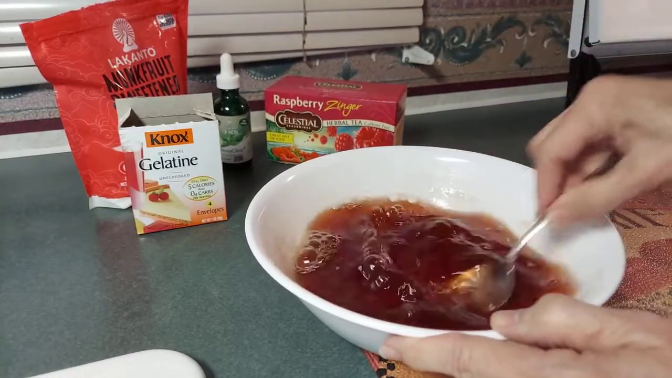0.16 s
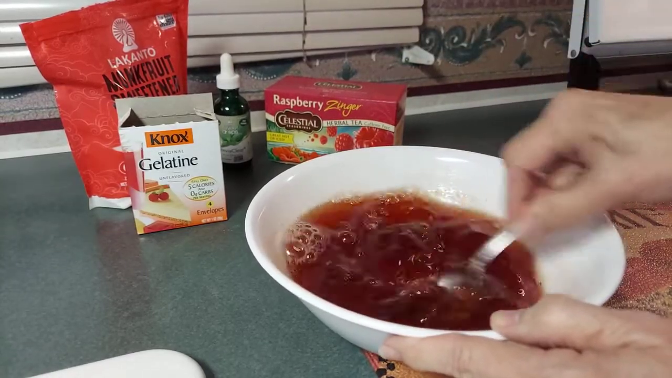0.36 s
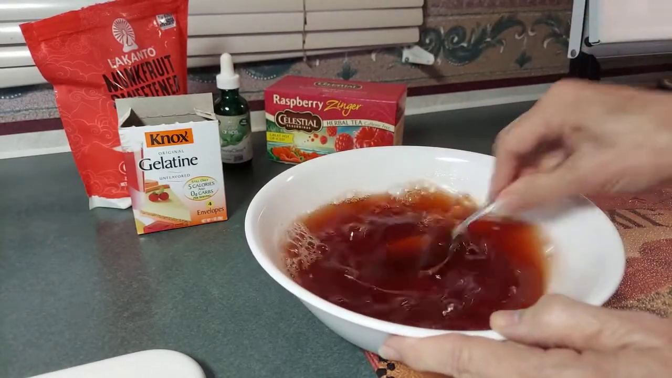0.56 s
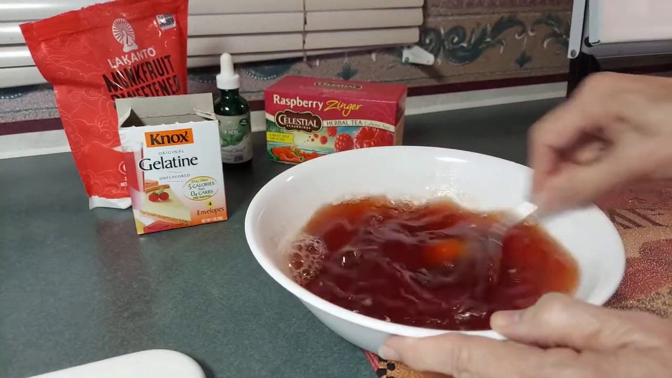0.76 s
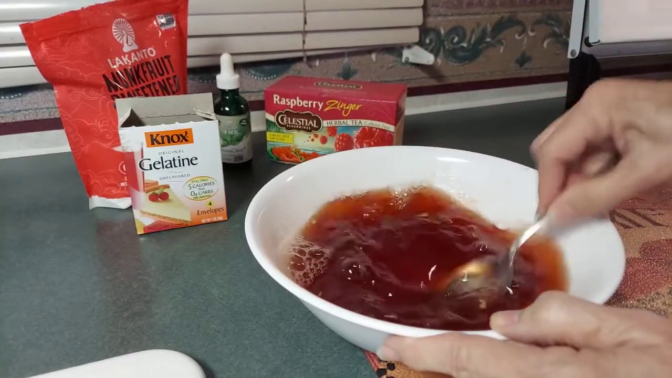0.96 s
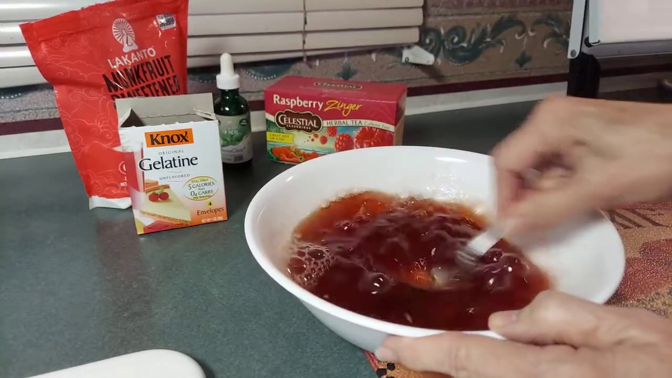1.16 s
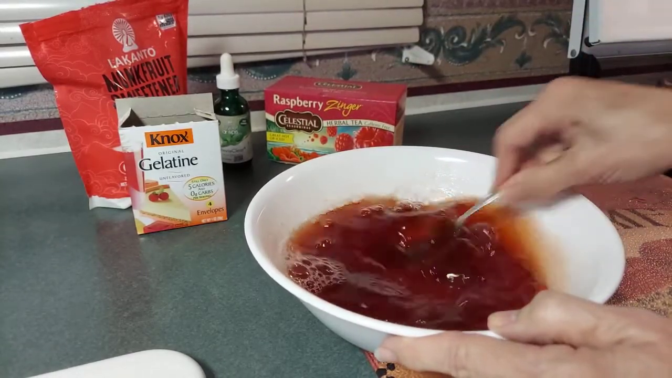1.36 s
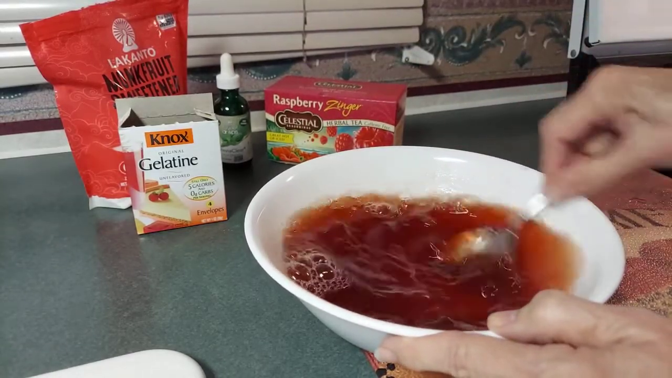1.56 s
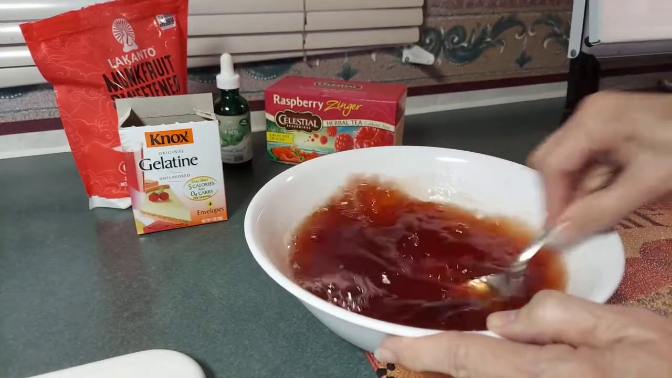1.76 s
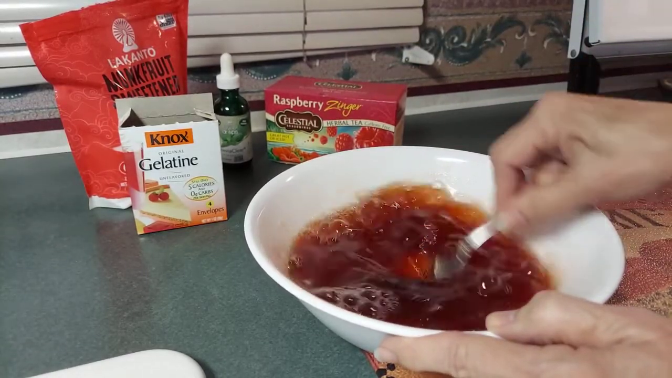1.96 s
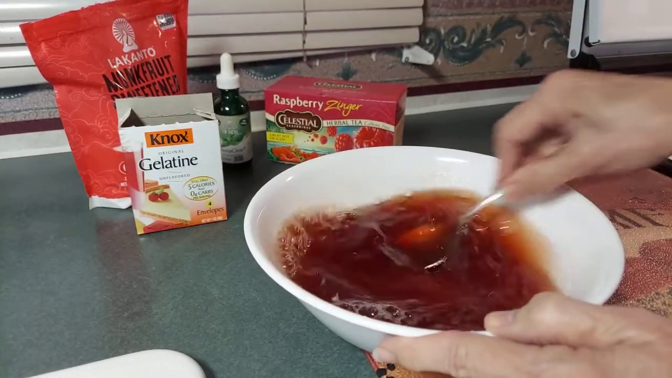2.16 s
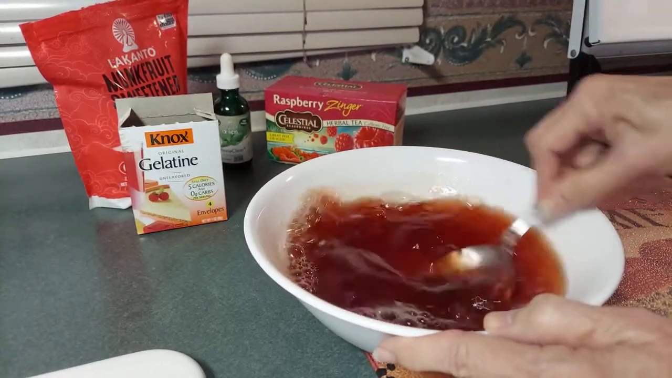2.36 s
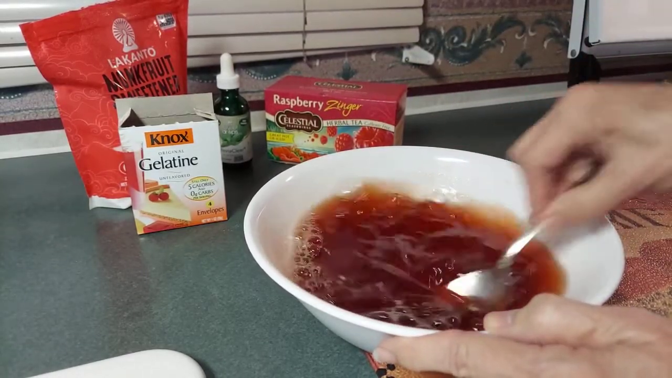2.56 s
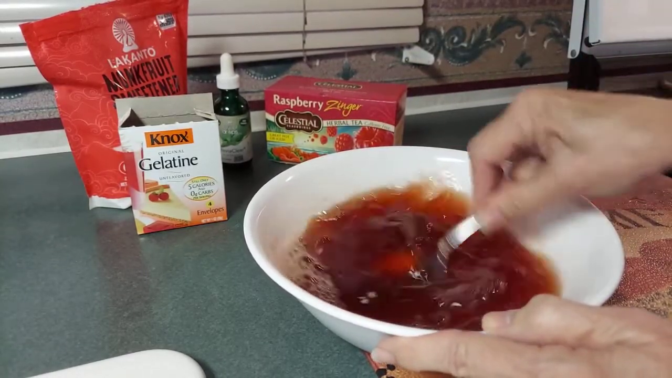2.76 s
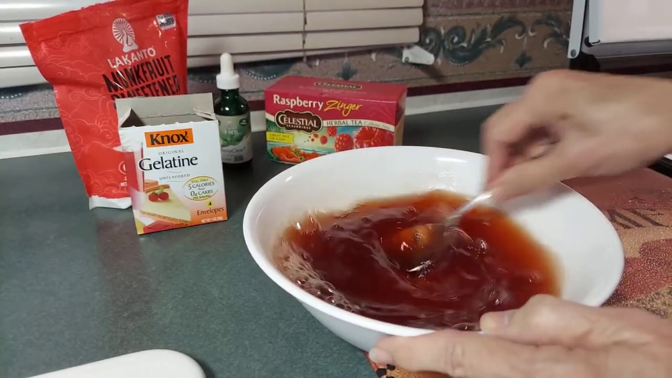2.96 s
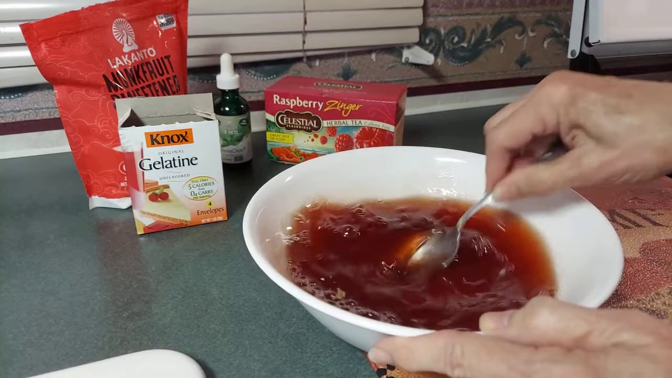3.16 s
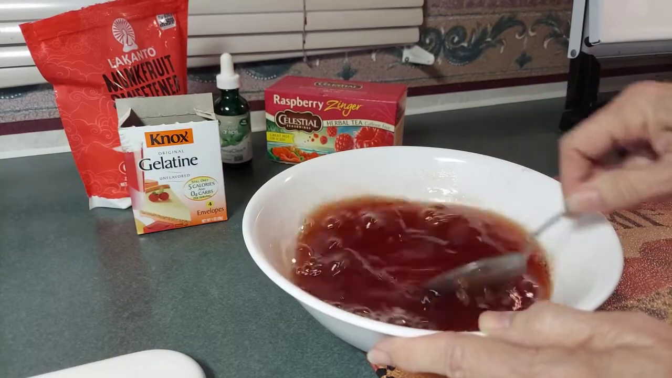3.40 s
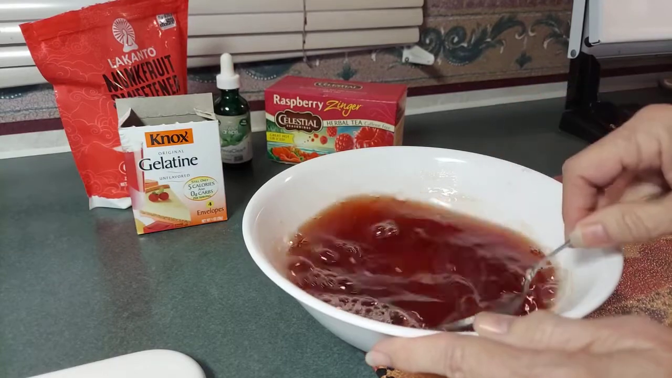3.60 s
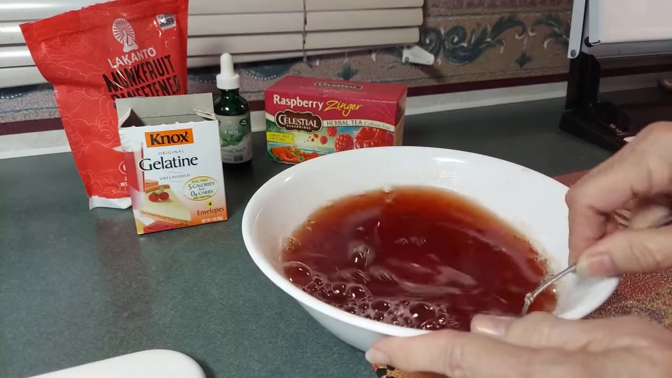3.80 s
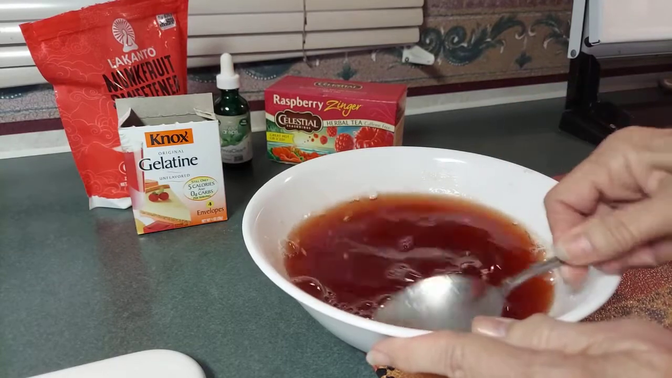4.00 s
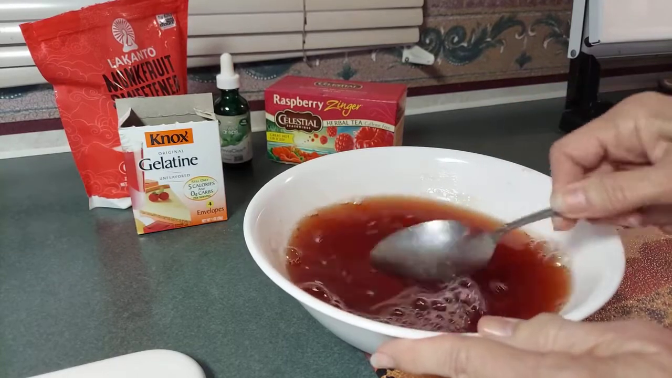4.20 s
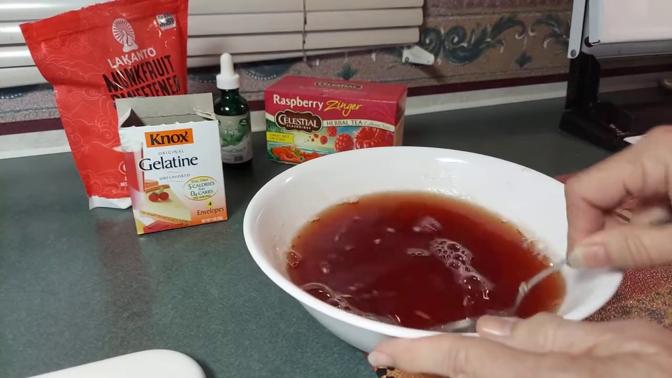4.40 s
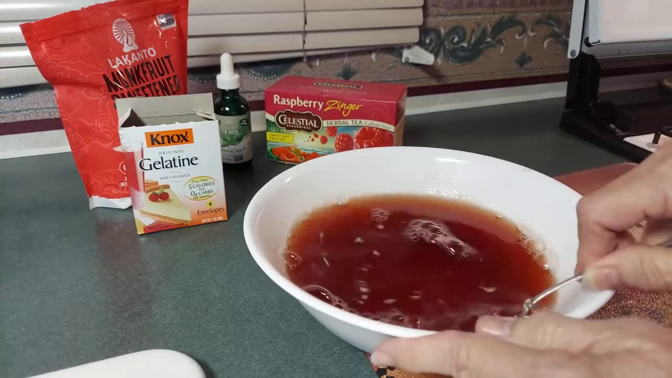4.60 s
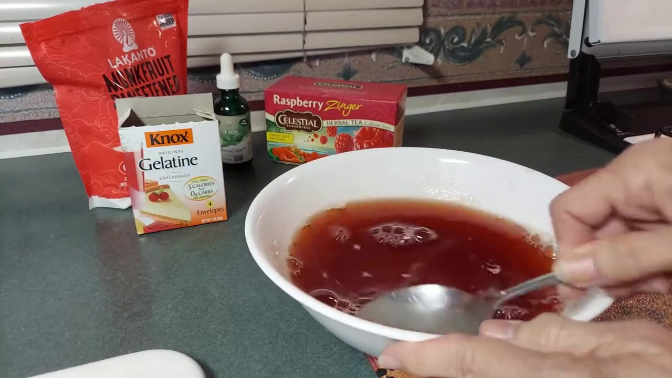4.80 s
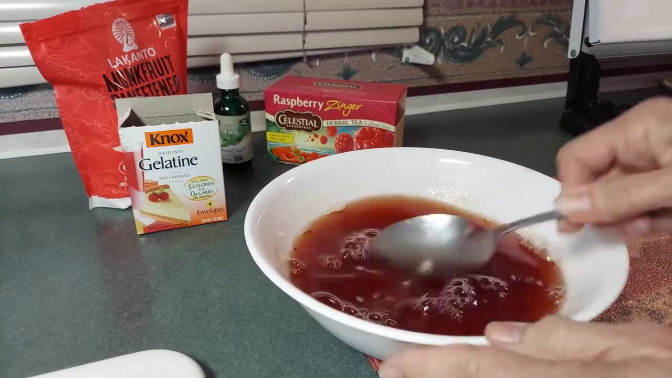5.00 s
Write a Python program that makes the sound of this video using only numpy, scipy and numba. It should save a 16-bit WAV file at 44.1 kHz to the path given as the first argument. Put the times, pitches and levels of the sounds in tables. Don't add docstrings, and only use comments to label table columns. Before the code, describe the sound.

Close up in a quiet home kitchen, a metal spoon sweeps quickly through liquid in a bowl, about seven or eight strokes a second, with wet scrapes, short glassy clinks and bubbly plops. Stirring stops just after three seconds; faint taps, light swishes and low bumps of the bowl on the counter follow. Stereo, treble brighter on the right.

```python
import sys
import numpy as np
from scipy import signal
from scipy.fft import rfft, irfft, next_fast_len
from scipy.io import wavfile
from scipy.ndimage import uniform_filter1d
from numba import njit

SR = 44100
rng = np.random.default_rng(int(sys.argv[2]) if len(sys.argv) > 2 else 0)


def gain_from_decibels(decibels):
    exponent = np.asarray(decibels, float) / 20
    return 10 ** exponent


def generate_wav(sig):
    pcm = np.round(np.clip(np.atleast_2d(sig).T, -1, 1) * 32767).astype(np.int16)
    wavfile.write(sys.argv[1], SR, pcm)


N = 222521
T = np.arange(N) / SR


def unit(x):
    return x / np.sqrt(np.mean(x ** 2))


def shape(x, table):
    hz, db = np.transpose(table)
    size = next_fast_len(N + 4096)
    bin_hz = np.arange(size // 2 + 1) * SR / size
    gain = gain_from_decibels(np.interp(np.log(bin_hz + 1), np.log(hz), db))
    return irfft(rfft(x, size) * gain, size)[..., :N]


def walk(rate_hz):
    k = int(SR / rate_hz)
    levels = rng.standard_normal(N // 100)[:N // k + 1]
    held = np.repeat(levels, k)[:N]
    return 1.56 * uniform_filter1d(uniform_filter1d(held, k), k)


def spikes(times_s, sizes):
    x = np.zeros(N)
    np.add.at(x, np.clip((np.asarray(times_s) * SR).astype(int), 0, N - 1), sizes)
    return x


def decay(t60_s):
    return 1000. ** (-1 / (t60_s * SR))


@njit
def ring(x, hz, fade):
    y, z = np.empty(len(x), np.complex128), 0j
    for i in range(len(x)):
        z = z * fade * np.exp(2j * np.pi * hz[i] / SR) + x[i]
        y[i] = z
    return y


def smear(x, t60_s, alike, rise_s=1e-5):
    t = T[:int(t60_s * SR)]
    same, left, right = rng.standard_normal((3, SR // 2))[:, :len(t)]
    noise = alike * same + np.sqrt(1 - alike ** 2) * np.array([left, right])
    tails = noise * 1000. ** (-t / t60_s) * np.minimum(t / rise_s, 1)
    return signal.fftconvolve(x[None], tails, axes=1)[:, :N]


def swells(s, db, rise_s, fall_s, bed_db, columns, bed_columns, order=2):
    t = T[::44]
    late_s = t - np.asarray(s)[:, None]
    before = late_s < 0
    width_s = np.where(before, np.reshape(rise_s, (-1, 1)), np.reshape(fall_s, (-1, 1)))
    bells = np.exp(-2 * np.abs(late_s / width_s) ** np.where(before, order, 2))
    power = gain_from_decibels(2 * np.asarray(db))[:, None] * bells
    bed = gain_from_decibels(2 * bed_db[::44])
    total = power.sum(0) + bed
    slow = [10 * np.log10(total)]
    slow += [(c @ power + b * bed) / total for c, b in zip(columns, bed_columns)]
    return [np.interp(T, t, c) for c in slow]


STIR_ENDS_S = 3.2


def stirring():
    return 1 / (1 + np.exp((T - STIR_ENDS_S) / 0.026))


# hardest contact in s, low wall modes in dB,
# middle, high and deepest mode in dB relative to low.
STROKES = [(0.051, -47.5, 0.5, -6.5, -3.5), (0.135, -42, -7, -12, -30), (0.27, -46.5, -14, -11, 2),
           (0.397, -44.5, -2.5, -2.5, -3.5), (0.542, -43, -5, -18.5, 10.5), (0.663, -49, -2.5, -1.5, -24),
           (0.805, -47.5, -6, -10.5, 22), (0.932, -48, -6.5, -4.5, -37), (1.063, -41, -1.5, -13, 7),
           (1.2, -42, -4.5, -1.5, -2), (1.349, -37, -11, -12, 10), (1.476, -44.5, 0, 0.5, -18.5),
           (1.61, -38, -1.5, -14, 0.5), (1.761, -44, 1.5, -1.5, -14.5), (1.893, -41.5, -1.5, -13, 5),
           (2.021, -44.5, 1.5, -3.5, -8), (2.162, -38.5, -7.5, -18, -4), (2.284, -48, 3, -1, -4),
           (2.436, -49.5, -12, -6, 15), (2.529, -52, -0.5, 0.5, 10), (2.69, -47.5, -10.5, -6.5, 11),
           (2.812, -37, -8, -16.5, -2), (2.959, -51.5, -5.5, -7, 0.5), (3.072, -52, 3.5, -14, -4)]
# landing to hardest contact in s, fade after it in s.
STROKE_SPANS = [(0.059, 0.052), (0.043, 0.048), (0.04, 0.046), (0.027, 0.046), (0.027, 0.023),
                (0.033, 0.039), (0.022, 0.031), (0.04, 0.058), (.03, .04), (0.025, 0.055), (0.03, 0.018),
                (0.0451, .04), (.04, 0.041), (0.045, 0.024), (0.028, 0.042), (0.04, 0.024), (0.028, 0.028),
                (0.038, 0.043), (0.034, 0.036), (0.014, 0.11), (0.025, 0.052), (0.029, 0.06), (0.045, 0.18),
                (0.012, 0.028)]
# time in s, low modes in dB,
# middle modes, high modes and grit in dB relative to low.
TOUCHES = [(3.154, -59.5, 3, -7, -16), (3.197, -62.5, -2, -11, 4), (3.72, -76, 3, -10, -10),
           (3.916, -78, -7, -4, -1), (4.1, -101, -1, -1, 0), (4.19, -77.5, -2, -9.5, 3),
           (4.515, -94, 3.5, -30.5, -22), (4.612, -94.5, 10, 10, 24), (4.745, -76, 2, 2, -6),
           (4.812, -65.5, 0.5, -18, -16), (4.899, -81.5, -9, -6, 20.5)]
TOUCH_RISE_S, TOUCH_FALL_S, TOUCH_DEEP_DB = 0.02, 0.049, 14.5
GRIT_DB, GRIT_PER_DB = -63.5, .5
DRAG_DB = -65.5


def contact():
    s, db, middle, high, deep = np.transpose(STROKES)
    rise_s, fall_s = np.transpose(STROKE_SPANS)
    grit = GRIT_DB + GRIT_PER_DB * (db + 44.0) - db
    s2, db2, middle2, high2, grit2 = np.transpose(TOUCHES)

    def both(stroke, touch):
        return np.r_[stroke + 0 * s, touch + 0 * s2]

    columns = [both(middle, middle2), both(high, high2), both(grit, grit2), both(deep, TOUCH_DEEP_DB)]
    bed_db = -100 + (DRAG_DB + 106.5) * stirring()
    return swells(both(s, s2), both(db, db2), both(1.275 * rise_s, TOUCH_RISE_S),
                  both(fall_s, TOUCH_FALL_S), bed_db, columns, (-1.0, -6.0, -8.5, -4.5), order=4)


def catches(db):
    sizes = gain_from_decibels(np.minimum(3.0 * rng.exponential(size=N), 11))
    caught = rng.random(N) < 1500 / SR
    return unit(caught * sizes * rng.choice([-1, 1], N)) * gain_from_decibels(db + 3.0 * walk(70))


def body(push, modes, drift, patchy_db, lag_s, deep_db=0, rise=0):
    out = 0
    for k, (hz, db, t60_s) in enumerate(modes):
        share_db = db + patchy_db * walk(14) + deep_db * (k == 0)
        z = ring(push * gain_from_decibels(share_db), hz * (1 + rise + drift * walk(9.1)), decay(t60_s))
        turn = 2 * np.pi * hz * lag_s * (rng.standard_normal() + 0.67 * walk(4.915))
        out = out + np.array([(z * np.exp(1j * turn)).imag, z.imag])
    return out


# time in s, crack peak in dB,
# low, middle and high ring in dB.
CLINKS = [(0.165, -44, -63, -42.5, -34), (0.2334, -40.5, -46, -36, -34), (0.2838, -49, -38.5, -59, -68),
          (0.3865, -41.5, -35, -39, -33), (0.4105, -37, -37, -40.5, -37), (1.1772, -42.5, -40, -38, -33),
          (1.3284, -54, -40.5, -59.5, -60), (1.3634, -47.5, -36, -47.5, -25.5),
          (1.5496, -28, -70, -49.5, -36), (1.5668, -18, -29.5, -23, -69), (1.6474, -46.5, -65.5, -52, -26),
          (1.733, -38, -36, -53, -52), (1.8692, -57.5, -76, -53, -47), (1.9904, -30, -67, -51, -46),
          (2.5396, -24.5, -32.5, -29, -11), (2.6770, -39.5, -36.5, -41.5, -59),
          (2.8055, -64, -39.5, -51, -48), (2.826, -26, -37, -35.5, -16.5),
          (3.0639, -33.5, -40.5, -36.5, -20.5), (3.1423, -33, -67.5, -38.5, -33)]
TAPS = [
    (3.7074, -52, -61, -59, -91),
    (3.8995, -65, -87, -89, -71.5),
    (4.1738, -60, -72, -64.5, -97),
    (4.5023, -72, -54, -61, -90),
]
# time in s, crack peak in dB.
GRAZES = [(0.0943, -51), (0.1532, -49), (0.5131, -56), (0.6497, -48), (0.6708, -47), (0.6829, -38),
          (0.8968, -45), (1.1525, -52), (1.3425, -38), (1.4024, -28), (1.4974, -51), (1.8849, -40),
          (1.9785, -46), (2.1128, -51), (2.1462, -45), (2.2048, -47), (2.3016, -47), (2.4128, -49),
          (2.5142, -55), (2.7325, -43), (2.7827, -51), (2.8743, -42), (3.1848, -53)]
GRAZE_RING_DB = (-28, -5.5, -23.5)
# frequency in Hz, level in dB, t60 in s.
BOWL = [
    [(840, -1, .065), (930, -8, .06), (1035, -9, .06), (1135, -1, .07), (1190, 0, .07)],
    [(1360, -5, .035), (1510, 0, .04), (1590, -2, .04), (1665, 0, .04), (1765, -1, .04), (1920, -1, .035),
     (2030, -4, .035)],
    [(2640, -18, .03), (2780, -13, .03), (2920, -7, .03), (3050, -6, .03), (3200, 0, .035), (3300, -2, .03),
     (3600, -9, .025), (3850, -16, .03)],
]
# frequency in Hz, level in dB, t60 in s.
SPOON = [(5150, -4, .025), (5680, -2, .04), (5850, 0, .04)]
# centre in Hz, level in dB.
GRIT = [(1600, -4.5), (2700, -24.5), (4400, -10.5), (6000, -7.5), (9000, -18), (13000, -22.5)]
# frequency in Hz, gain in dB.
GAP = [(1950, 0), (2200, -9), (2550, -9), (2900, 0), (3500, 0), (4000, -8), (4600, -3), (5200, 0)]
SWEEP_RISE = 0.016


def spoon():
    low_db, middle_db, high_db, grit_db, deep_db = contact()
    grazes = [(s, db, *np.add(db, GRAZE_RING_DB)) for s, db in GRAZES]
    s, crack_db, *ring_db = np.transpose(list(CLINKS) + list(TAPS) + grazes)
    blows = [smear(spikes(s, gain_from_decibels(db - 17)), .012, 1.0, .0025)[1] for db in ring_db]
    blows[2] = blows[2] * gain_from_decibels(-5)

    slope = uniform_filter1d(np.gradient(low_db), size=900)
    rise = SWEEP_RISE * np.tanh(-slope * SR / 250)
    low_push = catches(low_db - 34.5) + blows[0]
    wall = body(low_push, BOWL[0], 0.0034, 4.6, 0.00019, deep_db, rise)
    middle_push = catches(low_db + middle_db - 31.5) + blows[1]
    wall += body(middle_push, BOWL[1], 0.03, 2.1, 0.00013, rise=rise)
    high_push = catches(low_db + high_db - 26.5) + blows[2]
    wall += body(high_push, BOWL[2], 0.013, 2.7, 0.000202)

    cracks, grit = spikes(s, gain_from_decibels(crack_db)), catches(low_db + grit_db)
    steel_push = grit * stirring() * gain_from_decibels(-32 + 3 * walk(9)) + cracks * gain_from_decibels(-22)
    steel = body(steel_push, SPOON, .012, 2, 1.5e-4)

    same, *own = rng.standard_normal((3, N))
    puffs = np.sqrt(uniform_filter1d(grit ** 2, size=100).clip(0))
    scratch = puffs * (.5 * same + np.array(own)) * gain_from_decibels(3.0)
    fizz = 0
    for hz, db in GRIT:
        band = [(hz / 2.2, db - 40), (hz / 1.2, db), (hz * 1.2, db), (hz * 2.2, db - 40)]
        fizz = fizz + shape(scratch, band) * gain_from_decibels(4.5 * walk(25))

    crack = smear(cracks, 0.043, 0.077, .0015) * gain_from_decibels(-6.5)
    crack = crack + smear(cracks, 0.074, 0.74, 0.0024) * gain_from_decibels(-17.0)
    crack = shape(crack, [(500, -28.5), (900, -10), (3200, -4), (4200, 9.5), (5700, 3.0),
                          (9000, -7.0), (16000, -15.5)])
    ringing = shape(shape(wall, GAP) + steel, [(450, -26.0), (620, -21.0), (800, 1.0)])
    return ringing + shape(fizz + crack, GAP)


# time in s, frequency in Hz, length in s, level in dB rms.
SINGS = [(0.134, 1180, 0.03, -48), (0.14, 3220, 0.028, -56), (0.273, 1090, 0.023, -52),
         (0.383, 1170, 0.032, -53), (0.387, 3210, 0.032, -55), (0.533, 1110, 0.031, -51),
         (0.94, 3220, 0.021, -57), (1.072, 1200, 0.029, -53), (1.078, 2030, 0.02, -54),
         (1.207, 1220, 0.03, -52), (1.209, 3220, 0.03, -53), (1.215, 1550, 0.036, -53),
         (1.341, 840, 0.034, -44), (1.341, 1180, 0.027, -47), (1.363, 3230, 0.032, -55),
         (1.405, 2400, 0.021, -57), (1.405, 1690, 0.04, -55), (1.471, 1670, 0.033, -51),
         (1.473, 3170, 0.025, -52), (1.481, 1200, 0.029, -51), (1.562, 2380, 0.024, -57),
         (1.57, 3260, 0.04, -58), (1.75, 1560, 0.025, -51), (1.752, 2970, 0.021, -58),
         (1.758, 3210, 0.021, -50), (1.758, 1360, 0.022, -51), (1.76, 1180, 0.025, -48),
         (1.76, 1750, 0.029, -53), (1.898, 1890, 0.033, -54), (1.902, 1510, 0.031, -51),
         (1.902, 3240, 0.031, -57), (1.906, 840, 0.034, -51), (1.906, 1200, 0.04, -53),
         (2.001, 1720, 0.036, -54), (2.019, 2990, 0.024, -58), (2.021, 1180, 0.023, -49),
         (2.025, 2050, 0.022, -53), (2.151, 1110, 0.024, -46), (2.181, 860, 0.029, -50),
         (2.275, 3260, 0.038, -57), (2.277, 1580, 0.033, -51), (2.303, 2900, 0.024, -57),
         (2.688, 1170, 0.023, -48), (2.702, 1920, 0.034, -54), (2.808, 1580, 0.035, -51),
         (2.967, 1930, 0.034, -54), (3.067, 3210, 0.019, -49), (3.067, 1520, 0.022, -51)]
MORE_SINGS = [(.3, 845, 0.059, -61.5), (.57, 867, 0.054, -60.5), (.66, 1153, .04, -61.5),
              (.8, 878, 0.053, -61), (.835, 1144, 0.027, -54.5), (1.625, 1133, 0.034, -43.5),
              (2.45, 1870, 0.049, -56.5), (2.46, 864, 0.084, -66), (.8, 5830, 0.066, -70.5),
              (1.075, 5760, 0.043, -70), (2.42, 5750, 0.023, -63), (2.7, 5730, 0.11, -69)]
SING_DB, SING_T60_S, SING_STEADY = 3, .11, .75


def singing():
    out = np.zeros((2, N))
    for s, hz, length_s, db in list(SINGS) + list(MORE_SINGS):
        start = int((s - .1) * SR)
        span = slice(start, start + int(.2 * SR))
        late = (T[span] - s) / (0.56 * length_s)
        pitch_hz = hz * (1 + 0.002 * np.tanh(late))
        z = ring(rng.standard_normal(len(late)), pitch_hz, decay(SING_T60_S))
        z = z / (np.abs(z) + 1e-9) ** SING_STEADY
        turn = -.5 + .5 * rng.standard_normal()
        pair = unit(np.array([(z * np.exp(1j * turn)).imag, z.imag]))
        out[:, span] += gain_from_decibels(db + SING_DB) * np.exp(-late ** 2) * pair
    return shape(out, [(600, -25), (780, 0)])


# start in s, start
# pitch in Hz, end pitch in Hz, life in s, peak in dB.
BUBBLES = [(0.0532, 1510, 2700, .029, -42), (.1852, 445, 860, 0.057, -54), (0.2341, 1905, 3050, .0191, -28),
           (.2345, 2010, 2510, .0121, -33), (0.2358, 1435, 1525, 0.0171, -34.5),
           (0.3858, 2055, 2740, 0.0141, -38), (.3882, 922, 942, .0351, -38),
           (0.4102, 2730, 3140, .0121, -34), (0.6492, 1688, 1795, 0.0221, -40.5),
           (.6722, 2910, 3090, .0081, -43), (.7022, 665, 652, 0.0441, -45.5),
           (.7031, 2275, 2530, 0.0071, -35), (0.8978, 1505, 1660, 0.0181, -39.5),
           (1.0572, 1605, 1905, .0251, -40.5), (1.3648, 2700, 3250, 0.0091, -38),
           (1.3952, 1500, 3300, .008, -40), (1.4022, 2055, 2355, 0.0181, -38),
           (1.5688, 852, 1044, 0.0211, -21.5), (1.5758, 1005, 2150, 0.0241, -27.5),
           (1.6082, 3185, 3245, .0161, -39), (1.6478, 3155, 3400, 0.0131, -35),
           (1.6692, 2400, 3000, .0051, -42), (2.3012, 2215, 2520, 0.0065, -33),
           (2.5412, 1028, 1042, .0281, -36), (2.9418, 662, 720, 0.075, -50.5),
           (2.9532, 1905, 1945, .0301, -48), (3.0242, 932, 1245, .0201, -44),
           (3.0652, 1032, 1048, .0221, -34), (3.2712, 1505, 1560, .028, -62.5),
           (3.3162, 960, 2100, 0.0441, -68.5), (4.5002, 1452, 1484, 0.0201, -56),
           (4.5032, 760, 800, .016, -64), (3.7102, 790, 820, .03, -66), (3.7202, 480, 520, .02, -72),
           (1.5502, 1900, 2600, .007, -38), (.2462, 1950, 2700, .014, -38)]


def bubbles():
    out, wobble = np.zeros((2, N)), walk(250)
    for s, hz0, hz1, life_s, db in BUBBLES:
        span = slice(int(s * SR), int((s + 1.6 * life_s) * SR))
        t = T[span] - T[span][0]
        glide_hz = hz0 * (hz1 / hz0) ** np.minimum(t / life_s, 1.1)
        depth = min(.05, 0.16 * abs(np.log(hz1 / hz0)))
        phase = 2 * np.pi * np.cumsum(glide_hz * (1 + depth * wobble[span])) / SR
        swell = (1 - np.exp(-t / .0015)) * np.exp(-2.5 * (t / life_s) ** 2)
        tone = np.sin(phase + hz0 * np.array([[6e-4], [0]]))
        out[:, span] += gain_from_decibels(db + 2.5 * wobble[span]) * swell * tone
    return out + smear(out[1], 0.0354, 1.0) * gain_from_decibels(-30.5)


def slosh():
    low_db, middle_db = contact()[:2]
    out = np.zeros((2, N + SR))
    for when, pitch, size, cycles in rng.random((600, 4)):
        i, hz = int(when * 3.25 * SR), 750 * 5.5 ** pitch
        t = T[:int((6 + 16 * cycles) / hz * SR)]
        life = t / t[-1]
        phase = 2 * np.pi * hz * (t * (1 + 0.177 * life) + np.array([[1.2e-4], [0]]))
        db = min(low_db[i], -47) + middle_db[i] / 2 - 3 - 9 * pitch - 3.5 * np.log(size + .2)
        out[:, i:i + len(t)] += gain_from_decibels(db) * np.sqrt(life) * np.exp(-5 * life) * np.sin(phase)
    return out[:, :N]


FLECK_DB, FLECK_SCATTER_DB, FLECK_TILT_DB = 14, 3, -17


def splash():
    low_db, _, _, grit_db, _ = contact()
    out = np.zeros((2, N + SR))
    for when, pitch, size, length in rng.random((800, 4)):
        i, hz = int(when * STIR_ENDS_S * SR), 3400 * 4.4 ** pitch
        t = T[:int((.002 + .012 * length ** 2) * SR)]
        life = t / t[-1]
        jitter = np.cumsum(.25 * rng.standard_normal(len(t)))
        phase = 2 * np.pi * hz * (t * (1 + 0.014 * life) + np.array([[size], [0]])) + jitter
        db = low_db[i] + grit_db[i] + FLECK_DB + FLECK_TILT_DB * pitch
        db -= FLECK_SCATTER_DB * np.log(size + 0.015)
        swell = np.minimum(t / 0.0008, 1) * np.exp(-4 * life)
        out[:, i:i + len(t)] += gain_from_decibels(db) * swell * np.sin(phase)
    return out[:, :N]


# time in s, peak in dB.
SNAPS = [(0.2843, -39), (1.1518, -57), (1.322, -49), (1.3418, -36), (1.3628, -37), (1.3843, -41.5),
         (1.4024, -35.5), (1.6472, -53), (1.722, -66), (1.733, -63), (1.8863, -37), (2.145, -43),
         (2.3999, -66), (2.4136, -44.5), (2.733, -41.5), (2.887, -48), (.69, -46), (.65, -46), (.672, -53),
         (0.898, -46.5), (.941, -54), (2.919, -48.5), (2.961, -48)]


def snaps():
    s, db = np.transpose(SNAPS)
    clicks = smear(spikes(s, gain_from_decibels(db)), 0.0087, .5) * gain_from_decibels(-1)
    return shape(clicks, [(4000, -33.5), (6500, -3.5), (11000, 3.0), (16000, -4)])


# time in s, peak in dB.
TICKS = [(3.218, -59), (3.252, -58), (3.314, -66), (3.4218, -64), (3.463, -85), (3.5, -65), (3.6373, -38),
         (3.884, -83.5), (3.9654, -60), (4.066, -61), (4.177, -64), (4.425, -64.5), (4.556, -61),
         (4.694, -69), (4.8943, -58)]


def foam():
    s, db = np.transpose(TICKS)
    pops = spikes(s, gain_from_decibels(db))
    ticks = smear(pops, 0.013, 1.0) + smear(pops, 0.066, 0.2) * gain_from_decibels(-15.0)
    return shape(ticks, [(4000, -45.5), (7000, -15), (8800, 12.5), (10500, -9), (16000, -28.5)])


# time in s, level in dB, half length in s.
SWISHES = [
    (3.911, -76.5, 0.019),
    (4.099, -69, 0.049),
    (4.6, -77, 0.034),
    (4.749, -64, 0.037),
    (4.815, -70, 0.022),
    (4.89, -71, 0.051),
]
# frequency in Hz, level in dB per Hz.
SWISH = [(450, -16), (800, -6), (1800, -15.5), (2030, 3), (2300, -9), (3250, -7.5), (3700, -12.5),
         (5000, -6), (14000, -29)]


def swish():
    s, db, half_s = np.transpose(SWISHES)
    same, *own = rng.standard_normal((3, N))
    wash = unit(shape(0.87 * same + np.array(own), SWISH))
    level_db = swells(s, db, half_s, half_s, np.full(N, -120.), [], [])[0]
    return wash * gain_from_decibels(level_db + 2.0 * walk(60))


# time in s, first mode in dB, half length in s, upper modes in relative dB.
NUDGES = [(0.248, -49.5, 0.039, -16.5), (1.197, -30, 0.022, -18), (1.231, -33, 0.015, -23.5),
          (1.35, -49, 0.035, -15.5), (1.454, -50.5, 0.0411, -10.5), (1.58, -45, 0.024, -8.5),
          (1.736, -36.5, 0.013, -22.5), (2.005, -41.5, 0.046, -17), (2.052, -33.5, 0.028, -16),
          (2.271, -40, 0.034, -42), (2.81, -49.5, 0.09, -15), (3.08, -52, 0.065, -10.5),
          (3.732, -53, 0.021, 0.5), (3.877, -56, 0.06, -15.5), (3.992, -40.5, 0.041, -13.5),
          (4.089, -53.5, 0.081, -11.5), (4.217, -45.5, 0.0335, -16), (4.647, -53, 0.023, -9.5),
          (4.757, -46.5, 0.032, -5), (4.82, -34.5, 0.042, -2), (4.902, -36, .016, -7.5),
          (4.957, -44.5, 0.02, -9.5)]
# frequency in Hz, t60 in s, level in dB, left minus right in dB.
COUNTER = [(60.6, 0.44, -12, -5), (113.7, 0.33, -5, 4), (222.2, 0.27, -12, 7), (268, 0.11, -20.5, 7.5),
           (390, 0.12, -26, -1.5)]
CREEP_STIR_DB, CREEP_REST_DB, CREEP_UPPER_DB = -58, -65, -13


def counter():
    s, nudge_db, half_s, upper_db = np.transpose(NUDGES)
    creep_db = CREEP_REST_DB + (CREEP_STIR_DB - CREEP_REST_DB) * stirring()
    low_db, rel_db = swells(s, nudge_db, half_s, half_s, creep_db, [upper_db], [CREEP_UPPER_DB])
    out = 0
    for hz, t60_s, db, left_db in COUNTER:
        z = ring(rng.standard_normal(N), np.full(N, 1. * hz), decay(t60_s))
        z = z / np.abs(z) ** np.clip(150 / hz, .2, .8)
        apart = np.exp(1j * np.array([0.11 + hz / 200 * walk(14), np.zeros(N)]))
        level_db = low_db + db + rel_db * (hz > 150)
        out = out + gain_from_decibels(level_db + np.array([[left_db], [0]])) * unit((z * apart).imag)
    return shape(out, [(330, 0), (480, -6), (950, -28)])


CHIRPS = [.2, .63, 1.065, 1.49, 1.92, 2.29, 2.8, 3.247, 3.665, 4.093, 4.533, 4.975]
CRICKET_HZ, PULSE_EVERY_S = 4520, .047


def cricket():
    t = T[:int(.03 * SR)]
    sag = 1 - 0.028 * t / t[-1]
    pulse = np.hanning(len(t)) * np.sin(2 * np.pi * CRICKET_HZ * t * sag)
    starts_s = np.array(CHIRPS)[:, None] + PULSE_EVERY_S * np.arange(3) - t[-1] / 2
    sizes = gain_from_decibels(np.array([-78, -75, -75]) + 2 * rng.standard_normal(starts_s.shape))
    tone = signal.fftconvolve(spikes(starts_s.ravel(), sizes.ravel()), pulse)[:N]
    tone = tone * gain_from_decibels(3.5 * walk(120))
    return tone + smear(tone, .25, .2) * gain_from_decibels(-27)


# frequency in Hz, level in dB rms.
HUM = [(59.2, -58), (118.4, -70), (236.9, -82)]
# frequency in Hz, level in dB per Hz.
ROOM = [(82, -50), (140, -15), (244, -7), (393, -14.5), (425, -15.5), (584, -21.5), (3690, -28),
        (6060, -27.5), (7530, -22.5), (16000, -37)]
ROOM_DB = -77.5


def kitchen():
    hum = 0
    for k, (hz, db) in enumerate(HUM):
        hum = hum + np.sqrt(2) * gain_from_decibels(db + 0.5 * walk(1.7)) * np.sin(2 * np.pi * hz * T + 1.0 * k)
    mid, side = shape(rng.standard_normal((2, N)), ROOM)
    side = shape(side, [(60, -13.5), (300, -3.0), (700, 0.0)])
    air = unit(np.array([mid + side, mid - side])) * gain_from_decibels(ROOM_DB + 1.0 * walk(3.9))
    return hum * gain_from_decibels(np.array([[-.8], [.8]])) + air


# frequency in Hz, left minus right in dB.
SHADE = [(60, -1.5), (110, 8.5), (200, -19), (380, -18.5), (700, 0), (1290, -2.5), (2380, 0), (4400, -7.5),
         (8120, -21.5), (15000, -37)]


def scene():
    near = spoon() + singing() + bubbles() + shape(slosh(), GAP) + foam() + snaps()
    echo = smear(near[1], 0.16, 0.092) * gain_from_decibels(-34.5)
    far = echo + cricket() + kitchen()
    below = counter()
    left, right = near + far + splash() + swish()
    return np.array([shape(left, SHADE), right]) + below


def roll_off(x):
    return signal.sosfilt(signal.butter(12, 16660, fs=SR, output="sos"), x)


def record(dry):
    hiss = shape(rng.standard_normal((2, N)), [(300, 2.5), (3000, 1.5), (10000, -6.5), (16000, 4.5)])
    fade = np.clip((T[-1] - T) / .012, 0, 1)
    heard = (dry + hiss * gain_from_decibels(-82.5)) * fade
    mix = shape(heard, [(20, -24.5), (42, 0.0), (15800, 1.5), (16300, -26.5)])
    return roll_off(mix)


dry = scene()
out = record(dry)
generate_wav(out)
```